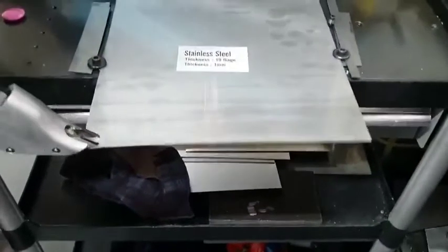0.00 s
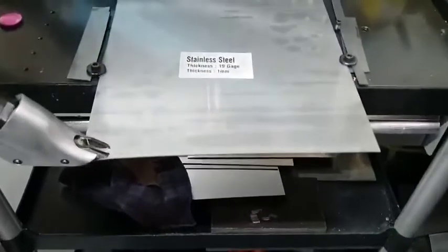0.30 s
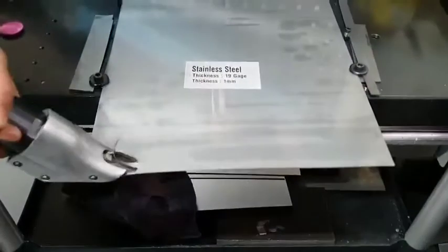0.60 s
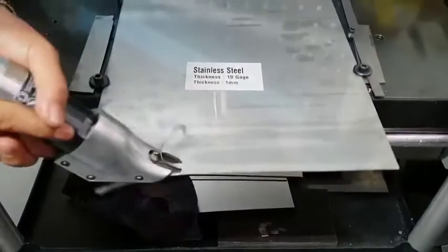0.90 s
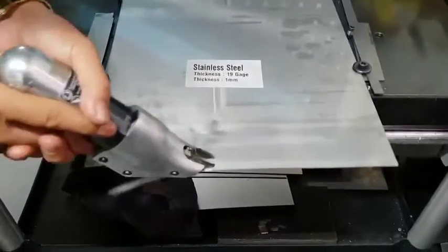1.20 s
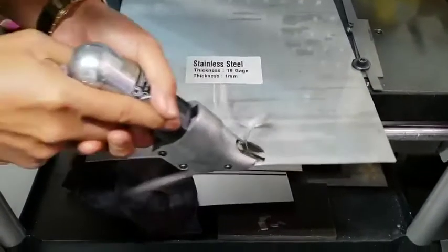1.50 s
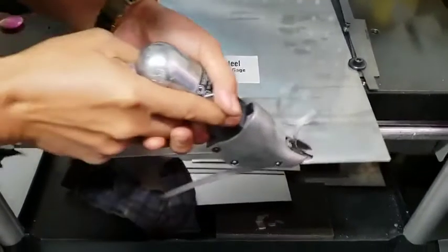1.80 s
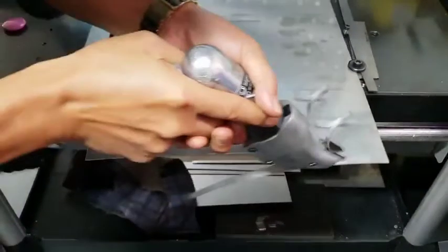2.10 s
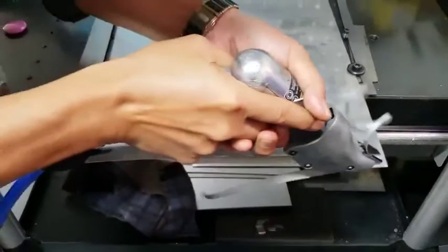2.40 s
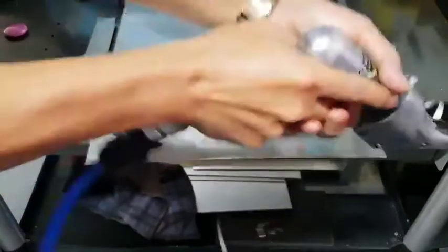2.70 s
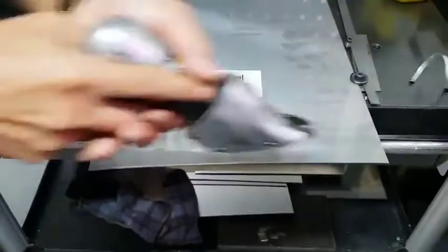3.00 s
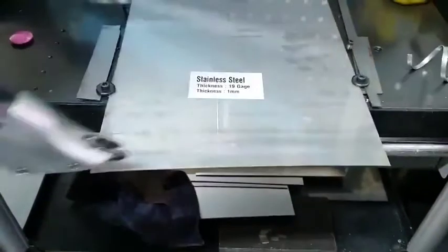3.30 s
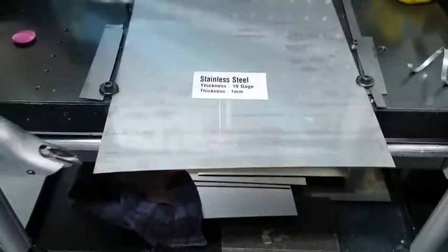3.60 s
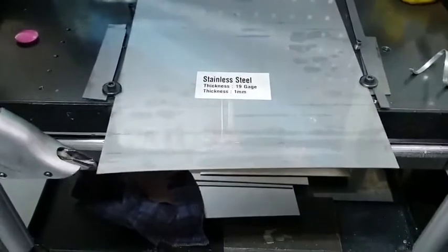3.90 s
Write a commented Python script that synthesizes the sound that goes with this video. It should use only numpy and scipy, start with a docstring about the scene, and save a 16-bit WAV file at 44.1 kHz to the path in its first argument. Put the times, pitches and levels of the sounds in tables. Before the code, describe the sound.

A pneumatic shear cuts a steel sheet with a rattling, hissing whine, then stops.

```python
"""A loud hiss and a rough whine: the vane motor of a handheld air shear, cutting thin steel on a cart.
Each blade stroke crunches through the metal, thumps the sheet and brakes the motor for a moment.
The blade breaks out with a few snaps, the trigger is released and the motor hoots as it spins down.
The air bleeds away; the sheet knocks on the cart and an offcut pings in the workshop."""
import sys
import numpy as np
from scipy import signal
from scipy.fft import rfft, irfft
from scipy.io import wavfile
from scipy.ndimage import map_coordinates

SR = 44100
rng = np.random.default_rng(int(sys.argv[2]) if len(sys.argv) > 2 else 0)


def generate_wav(sig):
    """Save sig (samples, or channels by samples) to the path in sys.argv[1] as 16-bit PCM at SR."""
    pcm = np.round(np.clip(np.atleast_2d(sig).T, -1, 1) * 32767).astype(np.int16)
    wavfile.write(sys.argv[1], SR, pcm)


N = 176400
T = np.arange(N) / SR
BREAKOUT_S, RELEASE_S = 2.59, 2.979   # the blade comes free; the trigger is let go
PORT_HZ, PORT_WIDTH_HZ = 800, 158   # resonance of the exhaust port

# braking by the cut: t/s, swing within a stroke/share of speed, random wobble/share of speed
LOAD = [(0, .003, .003), (.25, .016, .006), (.64, .016, .004), (.78, .068, .006), (1.25, .068, .008),
        (1.55, .075, .035), (2.5, .07, .03), (2.63, .014, .009), (2.8, .001, .001)]
# stereo width of scattered sound: f/Hz, side against mid/dB
WIDTH = [(100, -8), (500, -10), (1000, -2.5), (2500, 1), (4500, 2), (9000, -4.5), (13000, -6)]


def from_db(db):
    """Decibels to gain."""
    return 10 ** (np.asarray(db) / 20)


def rms_one(x):
    """Scale to unit rms."""
    return x / np.sqrt(np.mean(x ** 2) + 1e-20)


def in_time(rows):
    """One automation curve for each column after the time."""
    s, *columns = np.transpose(rows)
    return [np.interp(T, s, c) for c in columns]


def coloured(x, points):
    """EQ through points of f/Hz, gain/dB."""
    hz, db = np.transpose(points)
    size = 2 * x.shape[-1]
    f = np.maximum(np.fft.rfftfreq(size, 1 / SR), 1)
    gain = from_db(np.interp(np.log(f), np.log(hz), db))
    return irfft(rfft(x, size) * gain)[..., :size // 2]


def filtered(x, kind, hz):
    """Gentle low-pass or high-pass."""
    return signal.sosfilt(signal.butter(2, hz, kind, fs=SR, output="sos"), x)


def low_noise(hz):
    """Noise below a given frequency, rms 1."""
    return rms_one(filtered(rng.standard_normal(N + SR), "low", hz)[SR:])


def resonance(x, hz, width_hz):
    """Band-pass with unity gain at its peak."""
    r = np.exp(-np.pi * width_hz / SR)
    poles = [1, -2 * r * np.cos(2 * np.pi * hz / SR), r * r]
    return signal.lfilter(np.array([1, 0, -1]) * (1 - r * r) / 2, poles, x)


def ring(clicks, hz, t60):
    """A unit click sets a sine of height 1 ringing."""
    r, w = from_db(-60 / (t60 * SR)), 2 * np.pi * hz / SR
    return signal.lfilter([0, np.sin(w)], [1, -2 * r * np.cos(w), r * r], clicks + 1e-18)


def dying(start, t60):
    """Hard attack, exponential decay."""
    return (T >= start) * np.exp(-np.log(1000) * np.maximum(T - start, 0) / t60)


def struck(hits, modes, scatter_db):
    """Hits of t/s, level/dB strike every mode, each with a strength of its own."""
    s, db = np.transpose(hits)
    onsets = np.clip(s * SR, 0, N - 1).astype(int)
    out = np.zeros(N)
    for k, (hz, level_db, t60) in enumerate(modes):
        clicks = np.zeros(N)
        clicks[onsets] = from_db(db + level_db + scatter_db * rng.standard_normal(len(s)))
        out += ring(clicks, hz, t60) * (-1) ** k
    return out


def spread(pair):
    """Direct and scattered sound become left and right, rms 1."""
    mid, side = pair[0], coloured(pair[1], WIDTH)
    return rms_one(np.array([mid + side, mid - side]))


def wavering(x, patch_hz=598, patches_per_s=14):
    """The tone colour wavers in random patches, most in the treble."""
    hz, s, spectra = signal.stft(x, SR, nperseg=512)
    grid = np.meshgrid(hz / patch_hz, s * patches_per_s, indexing="ij")
    patches = map_coordinates(rng.standard_normal((100, 140)), grid, order=3, mode="mirror")
    depth_db = np.interp(hz, [4000, 12000], [2, 3])[:, None]
    return signal.istft(spectra * from_db(depth_db * patches), SR, nperseg=512)[1][:, :N]


def reflections(delay, t60):
    """A stereo burst of dying echoes with unit energy."""
    size = int((delay + t60) * SR)
    mid, side = (rng.standard_normal((2, SR)) * dying(delay, t60)[:SR])[:, :size]
    side = coloured(side, WIDTH)
    return rms_one(np.array([0.78 * mid + side, 0.69 * mid - side])) / np.sqrt(size)


def room_tail(low_t60=0.73, treble_t60=0.25, crossover_hz=3450):
    """Late echoes whose treble dies sooner."""
    tail = np.zeros((2, SR))
    for kind, t60 in ("low", low_t60), ("high", treble_t60):
        band = filtered(reflections(delay=0.018, t60=t60), kind, crossover_hz)
        tail[:, :band.shape[1]] += band
    return tail


def workshop(x, near_db, room_db, crossfade_s=.2):
    """Direct sound, room tail and quick reflections off sheet and cart that shift as the tool moves."""
    x = np.atleast_2d(x)
    out = x + from_db(room_db) * signal.fftconvolve(x, room_tail(), axes=1)[:, :N]
    for s in np.arange(0, T[-1] + crossfade_s, crossfade_s):
        span = np.flatnonzero(abs(T - s) < crossfade_s)
        piece = x[:, span] * np.cos(np.pi / 2 * (T[span] - s) / crossfade_s)
        echo = signal.fftconvolve(piece, reflections(delay=0.00045, t60=0.042), axes=1)[:, :N - span[0]]
        out[:, span[0]:span[0] + echo.shape[1]] += from_db(near_db) * echo
    return out / np.sqrt(1 + from_db(near_db) ** 2 / 3)


def room_tone():
    """A quiet, dark bed of noise."""
    # colour of the bed: f/Hz, gain/dB
    colour = [(15, -43), (30, -30), (60, -10.5), (115, -17), (190, -0.5), (300, -7), (450, -6.5),
              (1000, -9.5), (2000, -18), (5000, -22), (9000, -24.5), (14000, -26)]
    noise = rng.standard_normal(N) + 0.68 * rng.standard_normal((2, N))
    return from_db(-54.5) * rms_one(coloured(noise, colour))


def rumble(level_db=-69, lean_left_db=10.5):
    """Low rumble, different on each side, that drops back once the tool stops."""
    fade = np.interp(T, [RELEASE_S, RELEASE_S + 0.27], [1, .2])
    sides = filtered([low_noise(82), low_noise(75)], "high", 28)
    return from_db(level_db + lean_left_db * np.array([[1], [-1]])) * fade * sides


def bumps():
    """Dull bumps against the cart."""
    # thuds: t/s, level/dB, upper edge/Hz
    thuds = [(0.108, -40, 110), (0.194, -32.5, 151), (2.758, -47, 240), (3.671, -49, 1100),
             (3.975, -64, 300)]
    return sum(from_db(db) * dying(s, t60=0.19) * low_noise(hz) for s, db, hz in thuds)


def knocks():
    """The sheet knocks on the cart and rings briefly."""
    # contacts: t/s, level/dB
    hits = [(3.458, -49), (3.467, -40.5), (3.514, -51.5)]
    # modes of the knock: f/Hz, gain/dB, t60/s
    modes = [(219, -12, 0.25), (304, 2.5, 0.12), (477, 8.5, 0.082), (549, 2, 0.095), (804, 1, 0.044),
             (1060, -5, 0.098), (1560, -8, 0.047), (2230, -7, 0.11)]
    return struck(hits, modes, scatter_db=0.5)


def offcut(skitter_db=-12.5, jingle_db=-13):
    """A sliver of steel lands and pings; skittering after each landing keeps it jingling."""
    # landing and bounces: t/s, level/dB
    landings = [(3.629, -45), (3.647, -48), (3.857, -65)]
    # modes of the sliver: f/Hz, gain/dB, t60/s
    modes = [(4118, -22, 0.2), (4580, -19, .17), (5500, -19, .14), (6400, -22, .1), (7050, -23, .12),
             (7950, -7, .08), (8600, -12, .12), (9900, -1, 0.15), (11550, -17, .08), (12050, -17, 0.074),
             (12600, -19, .08), (13160, -14, .1)]
    envelope = sum(from_db(db + skitter_db) * dying(s, t60=0.094) for s, db in landings)
    skitter = envelope * rng.standard_normal(N)
    jingle = sum(ring(skitter, hz, t60) * from_db(db + jingle_db) for hz, db, t60 in modes)
    pings = struck(landings, modes, scatter_db=2.5)
    return pings + jingle + resonance(skitter, hz=7800, width_hz=6000)


def snaps(attack_s=0.0019, t60=0.033):
    """The metal snaps and the tool ticks: short, broad bursts of noise."""
    # snaps and ticks: t/s at mid-attack, level/dB, centre f/Hz
    bursts = [(2.61, -21, 5000), (2.657, -14.5, 5150), (2.731, -21, 8000), (2.758, -16, 3480),
              (2.968, -31, 7000), (3.116, -30, 1250), (3.229, -37.5, 3480), (3.387, -45, 7000),
              (3.431, -42, 5360), (3.457, -34, 1880), (3.67, -41.5, 1180), (3.74, -49, 2000)]
    out = np.zeros(N)
    for s, db, hz in bursts:
        envelope = np.clip((T - s) / attack_s + .5, 0, 1) * dying(s - attack_s / 2, t60)
        out += from_db(db) * envelope * rms_one(resonance(rng.standard_normal(N), hz, 0.5 * hz))
    return out


def sheet(strokes):
    """One push per stroke makes the sheet drone; its flexing hum swells and fades along the cut."""
    # modes of the sheet on the cart: f/Hz, relative level/dB, t60/s
    modes = [(150.5, -9, 0.12), (223, 3, .14), (261, 1.5, 0.18), (297, -3.5, 0.11), (329, -2, 0.18),
             (406, -2.5, 0.12), (500.5, -4.5, 0.21), (549, -3, 0.13), (771, 3.5, 0.1)]
    # thumping of the sheet: t/s, level/dB
    thump = [(0, -52), (.3, -44.5), (.65, -41), (1.0, -42), (1.4, -40.5), (2.0, -39.5), (2.45, -40.5),
             (2.65, -43), (2.8, -69), (3, -120)]
    # flexing hum: t/s, level/dB at 3 times the stroke rate, level/dB at 4 times
    flex = [(.6, -75, -72), (.85, -64, -53), (1.15, -57, -48.5), (1.4, -51, -64), (1.75, -51.5, -69),
            (2.02, -47.5, -42), (2.12, -51, -55), (2.6, -75, -66), (2.8, -110, -110)]
    pushes = [(s, 0) for s in T[1:][np.diff(np.floor(strokes)) > 0]]
    drone = filtered(struck(pushes, modes, scatter_db=3.0), "high", 90)
    hum = sum(from_db(db) * np.sin(2 * np.pi * order * strokes)
              for order, db in enumerate(in_time(flex), 3))
    return from_db(in_time(thump)[0]) * rms_one(drone) + hum * from_db(2 * low_noise(22))


def spin_down(vanes, port_db=17.5):
    """The falling vane tone hoots as it sweeps through the port resonance."""
    # coasting motor ahead of the port: t/s, vane tone/dB, its octave/dB
    coast = [(2.97, -50, -45), (2.99, -38, -46), (3.008, -37, -46), (3.015, -28, -42), (3.023, -28, -42),
             (3.031, -34, -40), (3.062, -27, -42), (3.08, -35, -46), (3.12, -43, -48), (3.2, -62, -64),
             (3.26, -90, -90)]
    tone = sum(from_db(db) * np.sin(2 * np.pi * order * vanes)
               for order, db in enumerate(in_time(coast), 1))
    tone = tone * (T > RELEASE_S) * (1 + 0.19 * low_noise(320))
    return tone + from_db(port_db) * resonance(tone, PORT_HZ, PORT_WIDTH_HZ)


def motion(first_stroke_s=.0208, coast_s=.073, bite_share=0.17):
    """Running counts of strokes and vane passes: each bite brakes the motor, which then recovers."""
    # blade speed: t/s, stroke rate/Hz
    pace = [(0, 44.2), (.1, 43.4), (.15, 41.2), (.28, 40.4), (.62, 40.35), (.76, 37.45), (1.02, 37.75),
            (1.25, 37.15), (1.5, 36.5), (2.05, 35.75), (2.45, 36.15), (2.62, 41.5), (2.76, 42), (2.81, 43),
            (2.97, 43.4)]
    speed = in_time(pace)[0] * np.exp(-np.maximum(T - RELEASE_S, 0) / coast_s)
    strokes = np.cumsum(speed) / SR - first_stroke_s * speed[0]
    swing, wobble = in_time(LOAD)
    surge = np.interp(strokes % 1, [0, 1 - bite_share, 1], [-1, 1, -1])
    vanes_per_stroke = 31.7
    vanes = vanes_per_stroke * np.cumsum(speed * (1 + swing * surge + wobble * low_noise(117))) / SR
    return strokes, vanes


def motor(strokes, vanes, jitter_rad=.12, roughness=.22, throb_depth=.4):
    """Air chopped by the vanes whines roughly; under load it throbs with the strokes."""
    # whine at twice the vane rate: t/s, level/dB
    whine = [(0, -28.5), (.12, -27), (.27, -23.5), (.55, -26), (.7, -25.5), (.85, -22.5), (1.05, -23),
             (1.3, -25.5), (1.55, -33), (2.2, -35), (2.5, -27), (2.57, -31), (2.69, -22.5), (2.73, -36),
             (2.81, -25), (2.89, -32), (2.95, -25), (2.98, -28)]
    # squeal as the blade enters and leaves: t/s, level/dB at 3 times the vane rate, level/dB at 4 times
    squeal = [(0, -40, -34), (.12, -40, -31), (.25, -46, -45), (2.5, -46, -46), (2.6, -44, -31),
              (2.67, -42, -30), (2.72, -40, -44), (2.8, -37, -46), (2.87, -43, -46), (2.95, -33, -45)]
    phase = 2 * np.pi * vanes + jitter_rad * low_noise(150)
    levels_db = in_time(whine) + in_time(squeal)   # three curves, one per harmonic
    tone = sum(from_db(db) * np.sin(order * phase) for order, db in enumerate(levels_db, 2))
    loaded = np.clip(in_time(LOAD)[0] / .016, .2, 1)
    throb = loaded * throb_depth * np.cos(2 * np.pi * (strokes + 0.15))
    driven = np.exp(-np.maximum(T - RELEASE_S, 0) / .008)
    return np.sqrt(2) * tone * (1 + throb + roughness * low_noise(230)) * driven


def exhaust(strokes, vanes, air_db=2.5, pulse_depth=0.17, flutter_depth=0.12, free_port_db=4):
    """Hiss pulses with strokes and vanes, then bleeds away; the freed motor blows the port harder."""
    # exhaust air while running: t/s, relative level/dB
    air = [(0.0, -19), (0.12, -18.5), (0.58, -24.5), (1.24, -23), (1.34, -21), (2.02, -21), (2.56, -20.5),
           (2.67, -20), (2.72, -22), (2.76, -18.5), (2.8, -25), (2.96, -22.5)]
    # air bleeding away after the release: t/s, level/dB
    bleed = [(2.97, -38), (2.985, -23.5), (3.02, -27), (3.1, -38), (3.17, -42.5), (3.2, -39.5), (3.26, -45),
             (3.35, -57.5), (3.5, -65.5), (4, -92.5)]
    # colour of the hiss: f/Hz, gain/dB
    colour = [(60, -32), (100, -32.5), (240, -20), (470, -20.5), (610, -19.5), (780, -13.5), (1030, -18.5),
              (1300, -15), (1800, -15.5), (2500, -9), (3300, -14), (4100, -14.5), (5200, -13), (5900, -14),
              (7700, -10.5), (8900, -13), (10500, -12), (12100, -8.5), (14000, -13.5)]
    running = T < RELEASE_S
    level = from_db(np.where(running, in_time(air)[0] + air_db, in_time(bleed)[0]))
    pulse = 1 + running * pulse_depth * np.cos(2 * np.pi * strokes)
    puffs = rng.standard_normal((2, N)) * (1 + flutter_depth * np.cos(2 * np.pi * vanes))
    sputter = from_db(3.24 * np.tanh(low_noise(310)))
    hiss = coloured(puffs * sputter, colour)
    free = running * np.clip((T - BREAKOUT_S) / 0.14, 0, 1)
    port = from_db(free_port_db) * free * resonance(hiss, PORT_HZ, PORT_WIDTH_HZ)
    return level * pulse * spread(hiss + port)


def shearing(strokes, cracks_per_s=5000, size_spread_db=3, bite_scatter_db=2.4):
    """Every bite is a burst of tiny cracks that ring the blades and housing."""
    # crunch of the parting metal: t/s, level/dB
    crunch = [(0, -34), (.15, -28), (.3, -38), (.65, -42), (.8, -33), (1.3, -30), (1.6, -24.5), (2.0, -23),
              (2.5, -23), (2.62, -26), (2.76, -26), (2.79, -70), (3, -120)]
    # colour of the cracks: f/Hz, gain/dB
    colour = [(150, -14), (400, -3.5), (780, -2.5), (1000, -5.5), (1250, 1.5), (1650, 4.5), (1830, -0.5),
              (2300, 1), (3200, 8), (4000, -7.5), (4700, 6), (5900, -9.5), (7200, 1.5), (9000, -11),
              (11500, -12), (14000, -8)]
    # ring of the blades and housing: f/Hz, width/Hz, gain over the cracks/dB
    housing = [(1234, 26, 8.5), (1600, 100, -3.5), (3650, 66, -17), (6660, 150, 2)]
    sizes = from_db(size_spread_db * np.minimum(rng.exponential(1, (2, N)), 4))
    sizes *= rng.choice([-1, 1], (2, N))
    lead_strokes, decay_strokes = .22, .55
    bite = np.exp(-((strokes + lead_strokes) % 1) / decay_strokes)
    bite *= from_db(bite_scatter_db * np.tanh(low_noise(44)))
    cracking = rng.random(N) < cracks_per_s / SR
    cracks = coloured(sizes * cracking * bite, colour)
    rung = sum(from_db(db) * resonance(cracks, hz, width) for hz, width, db in housing)
    return from_db(in_time(crunch)[0]) * spread(cracks + rung)


def scene():
    """Tool, sheet and offcut, each with its own reverb sends, over room tone and rumble."""
    strokes, vanes = motion()
    bright = wavering(exhaust(strokes, vanes) + shearing(strokes)) + snaps()
    body = sheet(strokes) + bumps() + knocks()
    whine = workshop(motor(strokes, vanes), near_db=-12, room_db=-19)
    hoot = workshop(spin_down(vanes), near_db=-14, room_db=-13)
    pings = from_db(5) * workshop(offcut(), near_db=-5, room_db=-4)
    bright = workshop(bright, near_db=-6, room_db=-15)
    body = workshop(body, near_db=-1.5, room_db=-10.5)
    mix = room_tone() + rumble() + pings + body + hoot + whine + bright
    return mix * from_db([[.3], [-.3]])   # a touch to the left


def record(dry):
    """A steep low-pass takes off the very top."""
    cutoff_hz = 14200
    return signal.sosfilt(signal.ellip(12, .2, 80, cutoff_hz, fs=SR, output="sos"), dry)


dry = scene()
out = record(dry)
generate_wav(out)
```